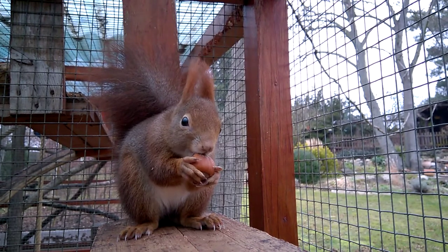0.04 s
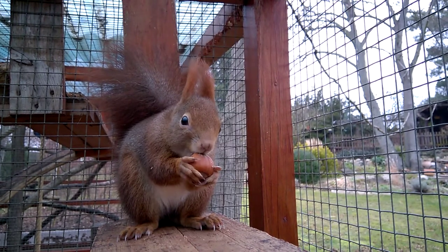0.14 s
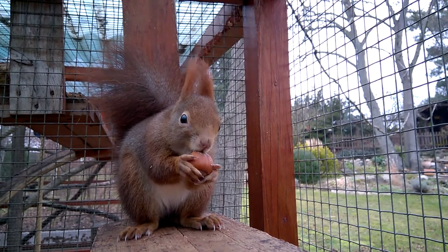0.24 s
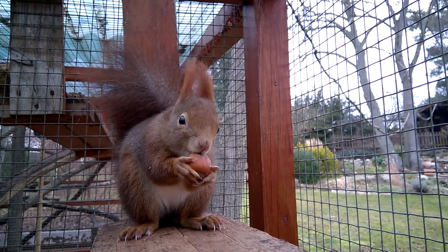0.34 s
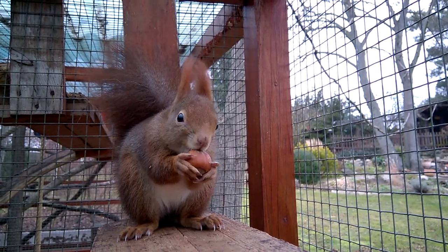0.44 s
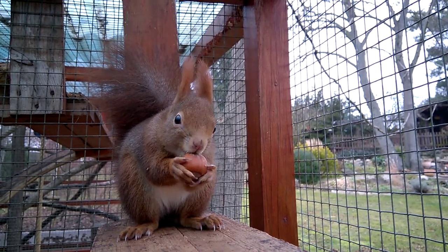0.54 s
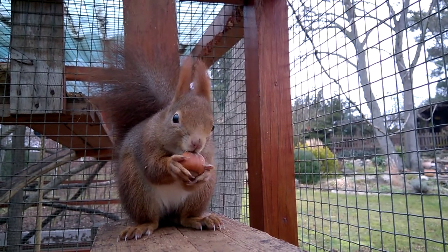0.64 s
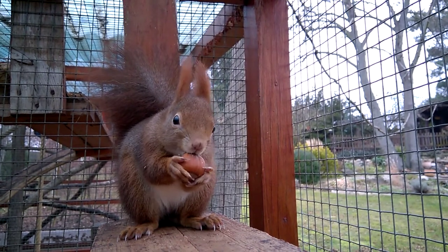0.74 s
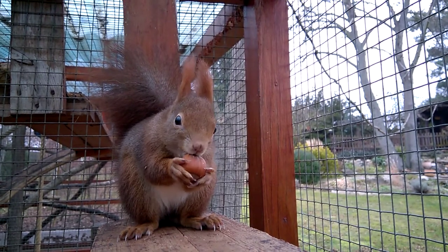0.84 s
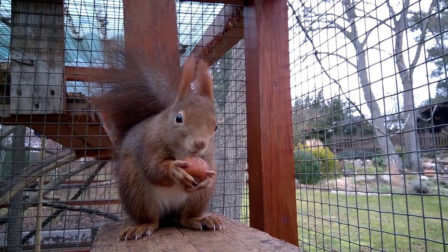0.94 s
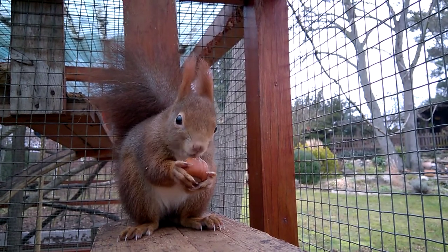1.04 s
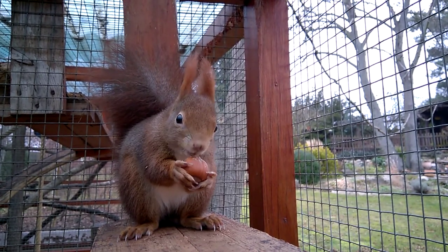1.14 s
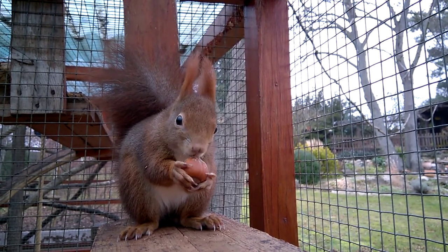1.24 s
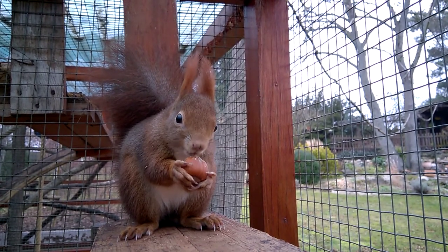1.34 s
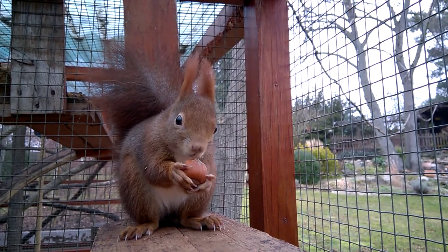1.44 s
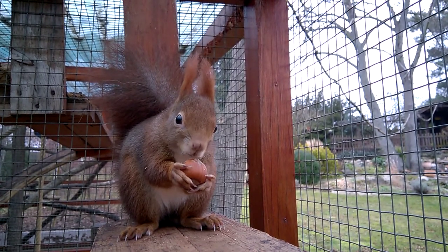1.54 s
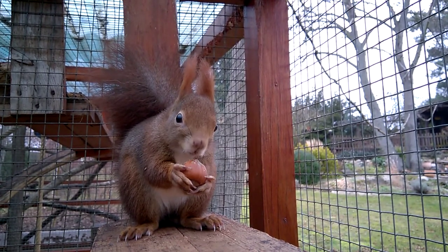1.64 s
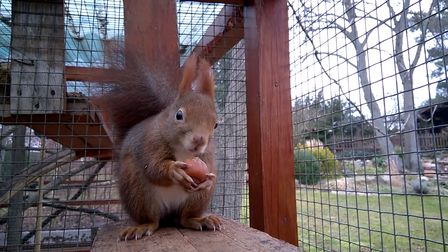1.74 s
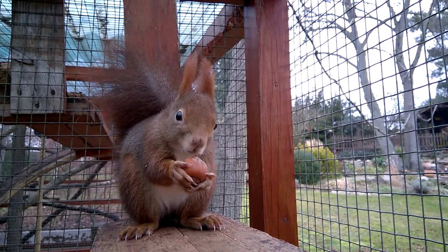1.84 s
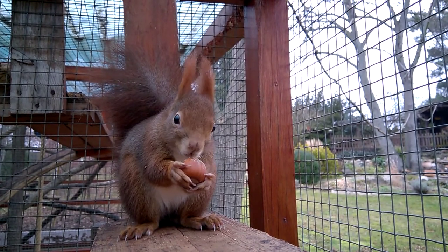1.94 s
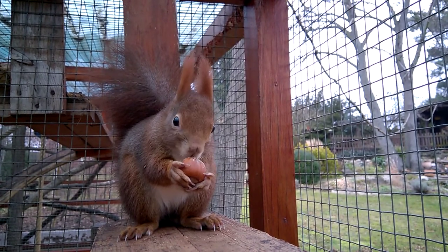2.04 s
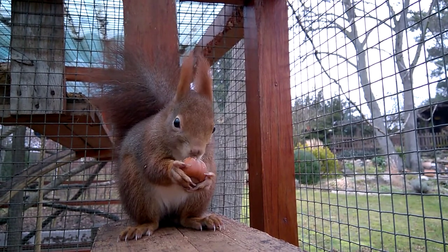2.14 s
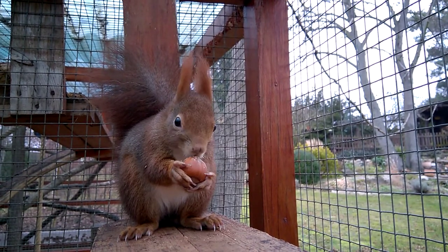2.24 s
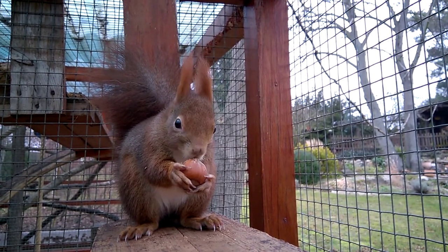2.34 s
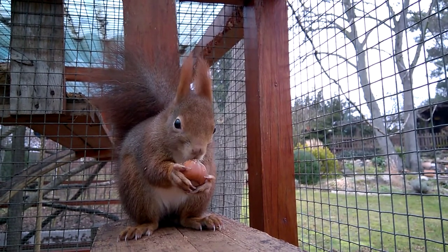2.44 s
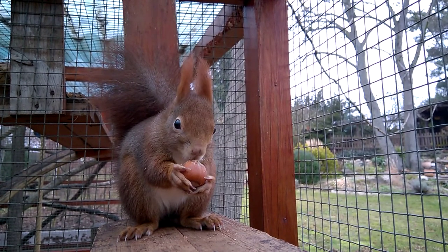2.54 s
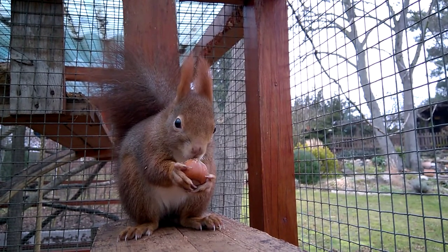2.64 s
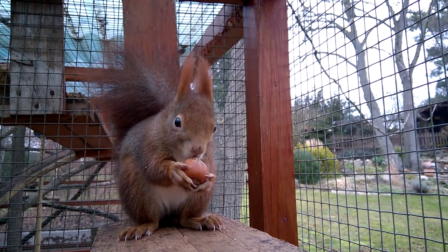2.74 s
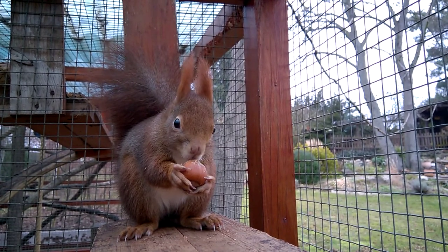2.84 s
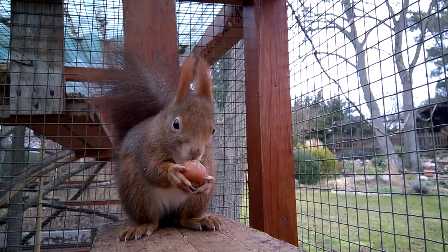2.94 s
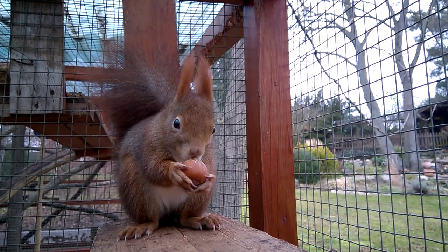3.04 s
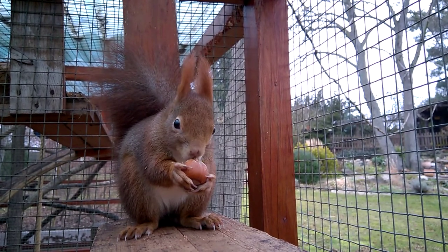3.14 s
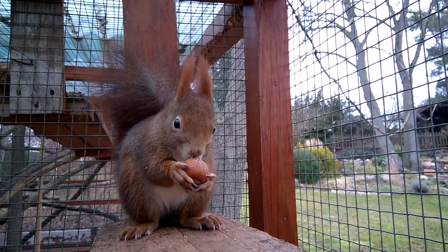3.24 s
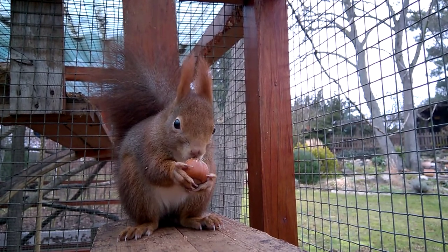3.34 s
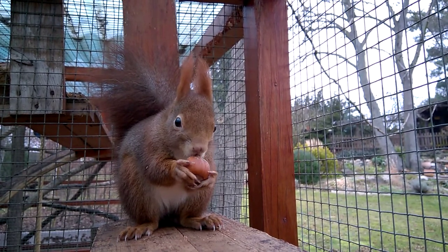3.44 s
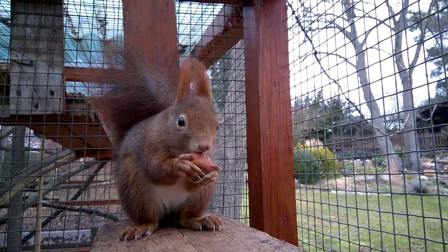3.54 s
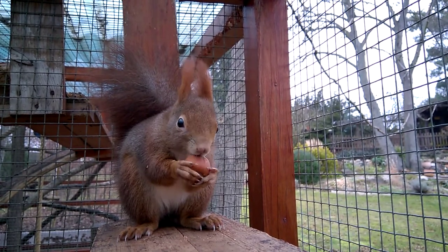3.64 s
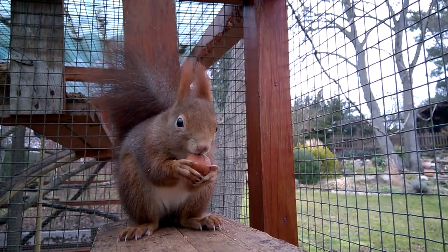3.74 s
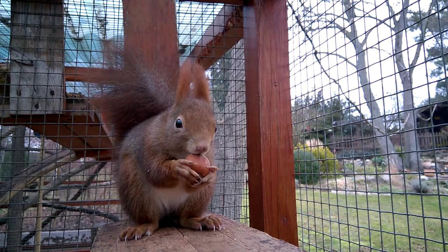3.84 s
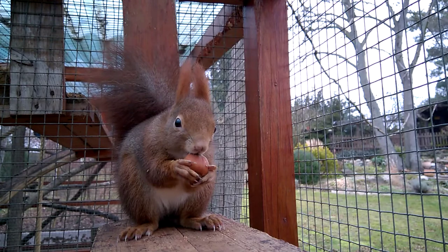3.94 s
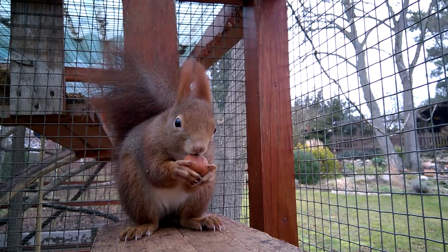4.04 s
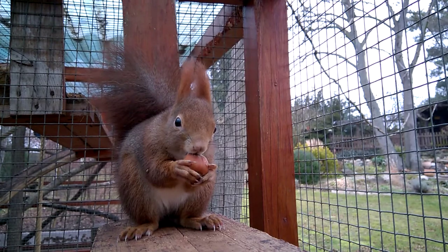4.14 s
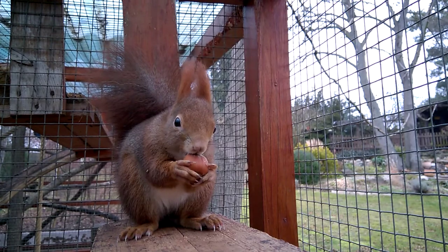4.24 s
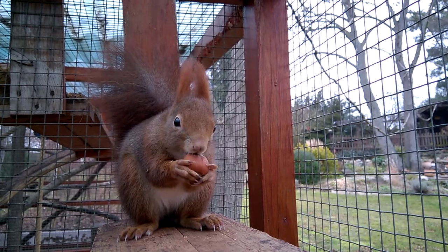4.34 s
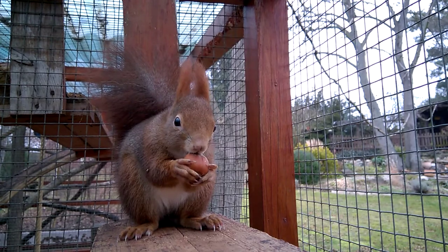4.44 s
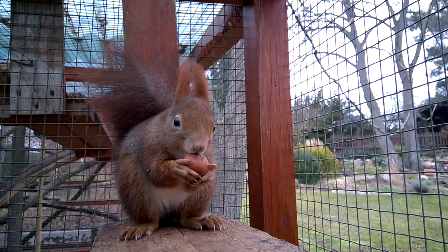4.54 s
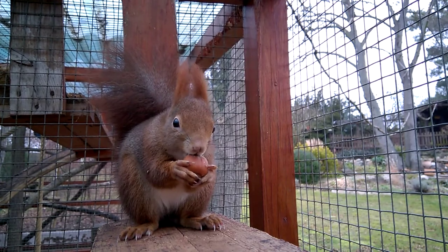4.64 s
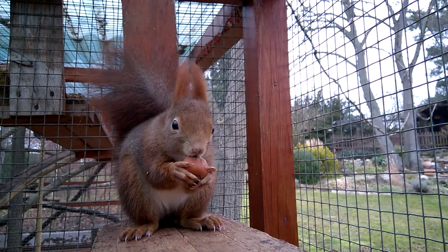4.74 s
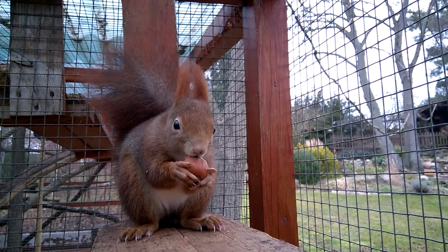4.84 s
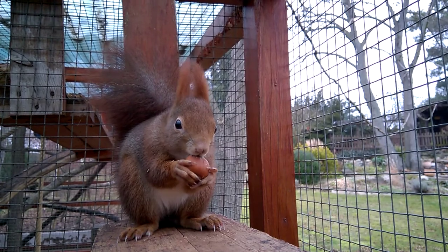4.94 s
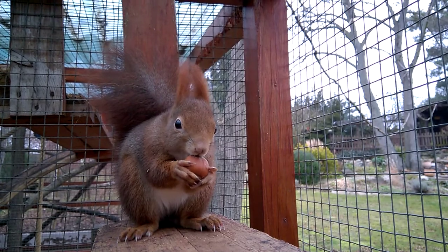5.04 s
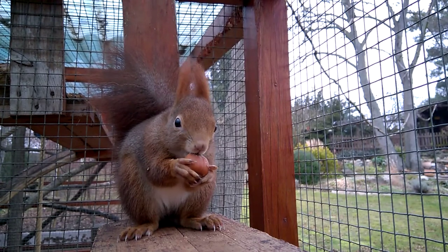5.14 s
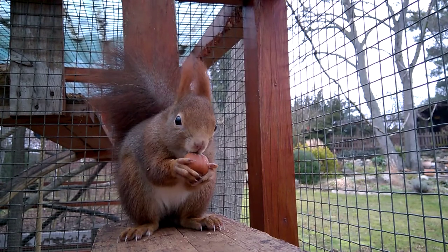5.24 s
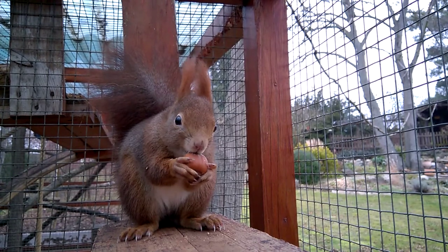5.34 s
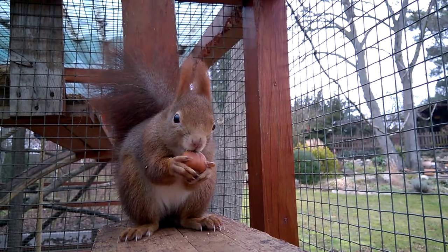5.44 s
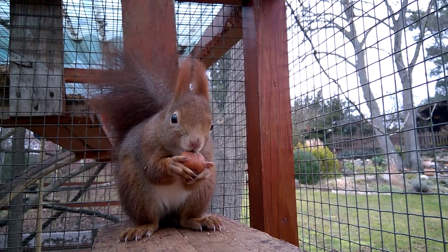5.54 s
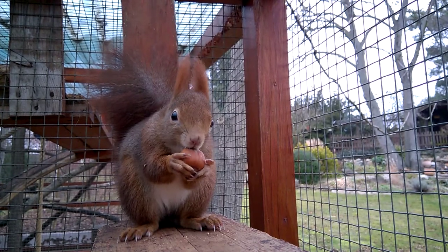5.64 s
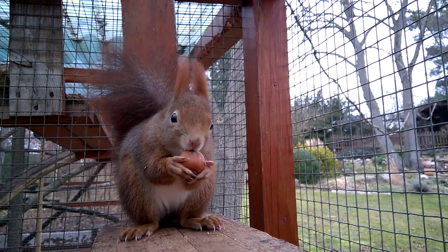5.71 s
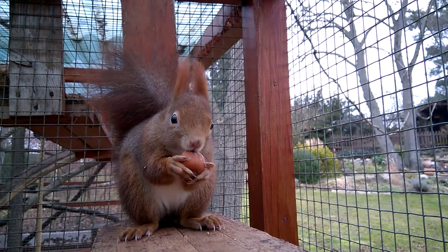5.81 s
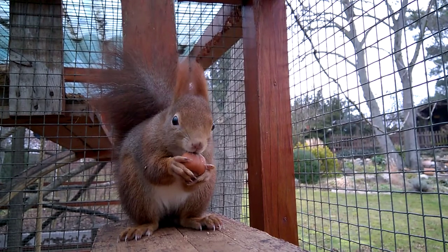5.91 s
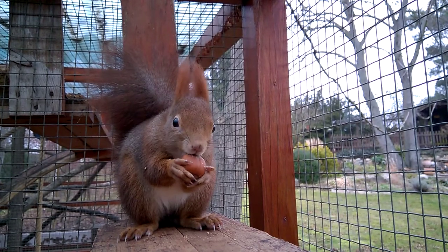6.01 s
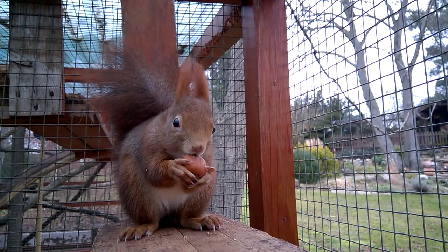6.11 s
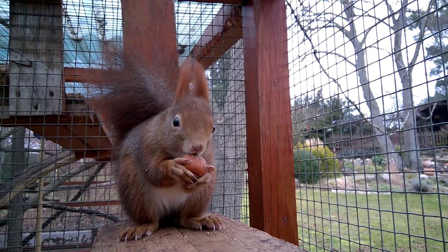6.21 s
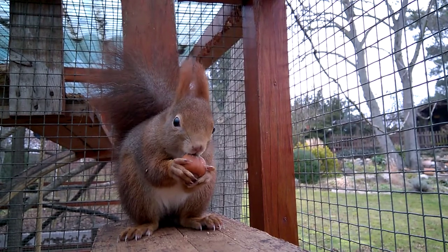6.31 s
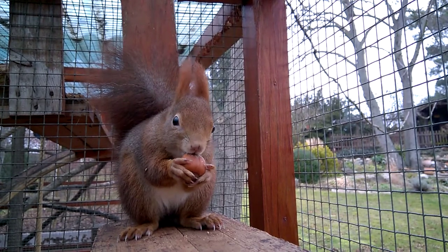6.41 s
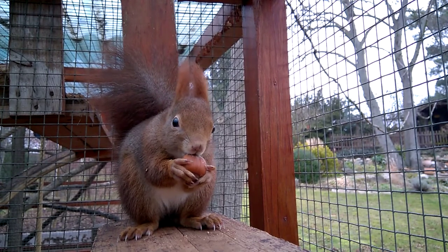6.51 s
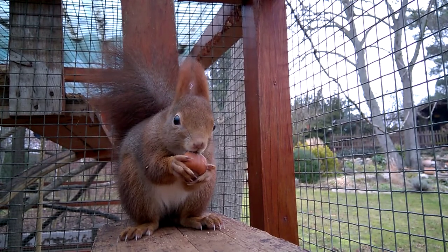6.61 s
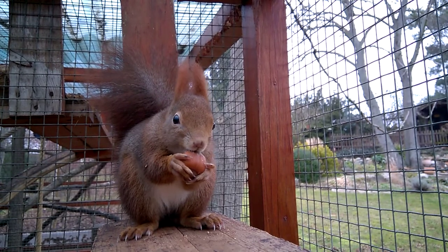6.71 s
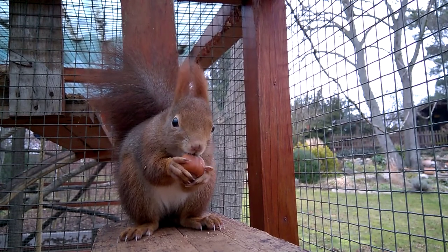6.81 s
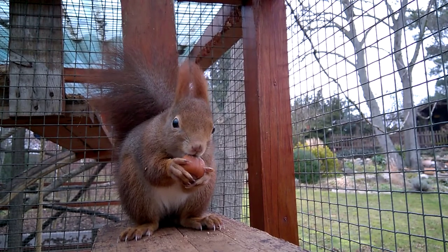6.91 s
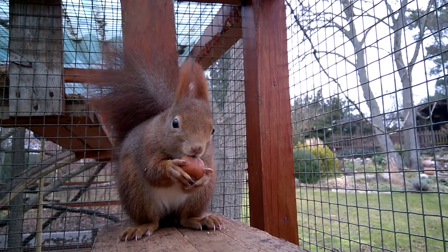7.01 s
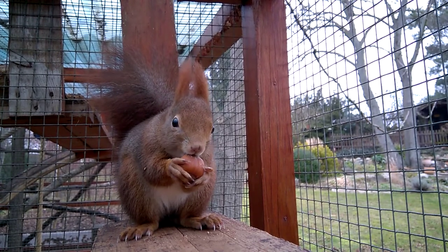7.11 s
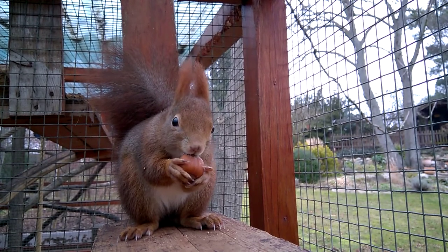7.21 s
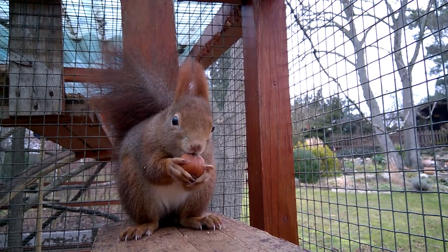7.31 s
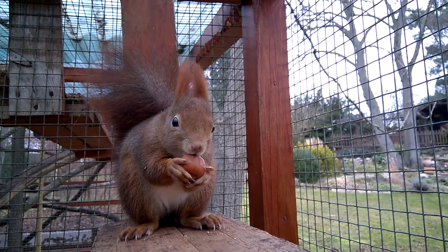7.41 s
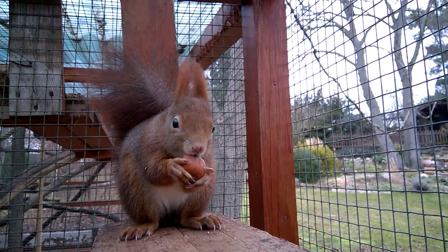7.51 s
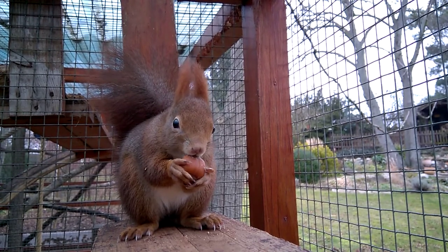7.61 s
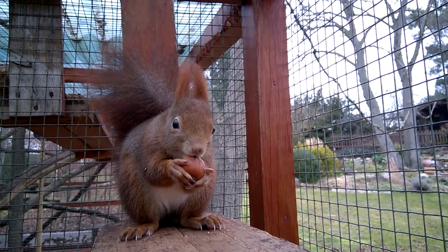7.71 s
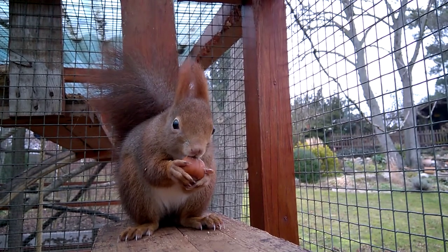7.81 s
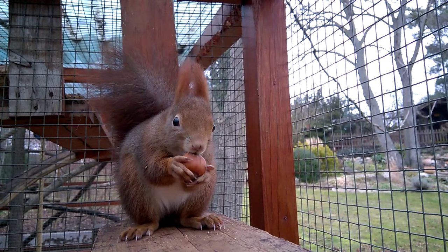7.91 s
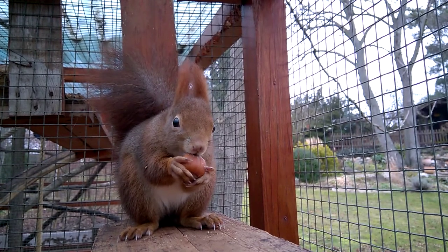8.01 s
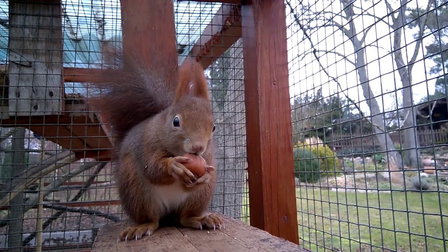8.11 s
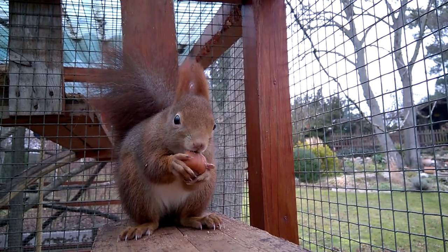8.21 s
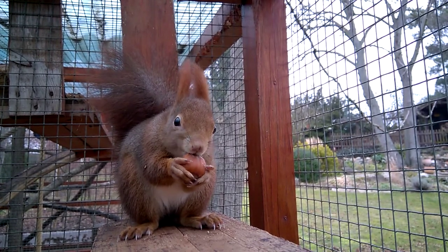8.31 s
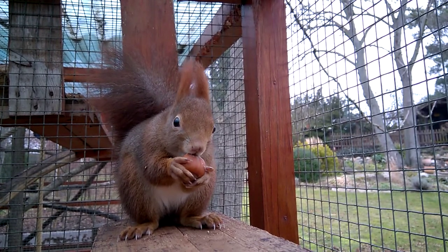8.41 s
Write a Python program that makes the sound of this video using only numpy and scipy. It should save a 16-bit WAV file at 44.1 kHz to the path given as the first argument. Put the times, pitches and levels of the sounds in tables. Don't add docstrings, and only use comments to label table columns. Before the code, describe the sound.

Very close, a squirrel scrapes its teeth on a thick nutshell about eight times a second, with crisp cracks and tiny hollow ticks. After less than a second it stops for about three seconds, leaving thin bird whistles, leaves and far traffic. Gnawing then returns and continues to the end, snappier later. Outdoor wooden cage, close microphone, short dry reflections.

```python
import sys
import numpy as np
from scipy import signal
from scipy.fft import rfft, irfft, next_fast_len
from scipy.io import wavfile
from scipy.ndimage import uniform_filter1d, map_coordinates

SR = 44100
rng = np.random.default_rng(int(sys.argv[2]) if len(sys.argv) > 2 else 0)


def inscribe(sig):
    pcm = np.round(np.clip(np.atleast_2d(sig).T, -1, 1) * 32767)
    wavfile.write(sys.argv[1], SR, pcm.astype(np.int16))


def natural_amplitude(level_db):
    exponent = np.asarray(level_db, float) / 20
    return 10 ** exponent


N = 373082

# (time [s], road level [dB], breeze level [dB])
GARDEN_SWELL = [
    (0, -65, -67.5),
    (1.5, -64, -71.5),
    (3, -61, -71.5),
    (5.2, -60, -67),
    (6.5, -57, -68.5),
    (8.46, -57, -65),
]
# (frequency [Hz], level [dB per Hz])
RUMBLE_COLOUR = [(8.8, -63), (15, 4), (52, -0.5), (98, -6.5), (117, -16.5), (145, -14), (300, -28),
                 (660, -120)]
TRAFFIC_COLOUR = [(120, -52), (200, -6), (264, -13), (357, -4), (498, -5), (670, -6), (900, -13.5),
                  (1400, -90)]
TYRE_COLOUR = [(600, -18.5), (800, -17), (980, 4.5), (1120, -5), (1350, -2), (1700, -14.5), (2600, -29),
               (3500, -38.5)]
LEAF_COLOUR = [(1290, -6.5), (2200, -8.5), (3480, -6.5), (5200, -8), (7540, -19.5), (9000, -55),
               (11700, -41), (19800, -120)]
DUST_COLOUR = [(7500, -20), (8000, -12.5), (8700, 6.5), (10200, 5), (11500, -6), (14000, -10.5),
               (16000, -7.5)]
MIC_HISS_COLOUR = [(300, 4), (8000, -5.5), (10000, -5.5), (12500, -2), (15500, -4.5)]
# (time [s], length [s], start pitch [Hz], end pitch [Hz], level [dB])
NEAR_WHISTLES = [(.37, .057, 6730, 6400, -73), (0.47, 0.075, 6750, 5650, -75),
                 (0.59, 0.068, 6970, 6100, -86), (.62, .02, 5570, 5350, -79), (0.964, .03, 3760, 3670, -88),
                 (1.1, 0.033, 3830, 3920, -86), (1.857, .029, 6100, 5900, -88),
                 (2.157, 0.056, 6190, 5370, -84), (4.855, 0.12, 7340, 6030, -78),
                 (5.07, 0.055, 7100, 6300, -73), (5.63, .04, 3550, 3450, -75),
                 (6.415, .02, 5000, 4950, -76), (6.046, 0.03, 6800, 5700, -83),
                 (7.859, 0.05, 7190, 6500, -68), (8.053, 0.098, 7430, 6540, -76)]
# (time [s], length [s], start pitch [Hz], end pitch [Hz], level [dB])
FAR_CHIRPS = [(1.202, 0.042, 3750, 2520, -81), (1.26, .052, 5700, 5240, -84.5),
              (1.364, 0.027, 6800, 5730, -81.5), (1.413, 0.061, 6000, 3120, -80),
              (1.605, 0.063, 5960, 3800, -80.5), (2.243, 0.068, 8100, 6900, -89),
              (2.297, 0.069, 5050, 3480, -76.5), (2.306, 0.055, 5350, 6700, -78.5),
              (2.455, 0.027, 4700, 6300, -81.5), (3.117, 0.04, 3900, 3040, -77),
              (4.023, 0.045, 5250, 5700, -73), (4.086, 0.029, 4730, 3940, -67.5)]
# (time [s], length [ms], rasp level [dB])
TOOTH_STROKES = [(0.02, 70, -36.5), (0.148, 59, -42), (0.275, 70, -41.5), (0.406, 49.3, -35),
                 (0.52, 74.5, -36.5), (0.652, 56, -45.5), (3.706, 49, -46), (3.821, 44, -43.5),
                 (3.919, 67, -46), (4.05, 52, -42), (4.154, 48, -39), (4.256, 47, -35.5),
                 (4.351, 65, -44.5), (4.472, 57, -39.5), (4.588, 55, -33.5), (4.715, 63, -38),
                 (4.867, 54, -45.5), (4.99, 64.5, -41.5), (5.123, 67, -42), (5.251, 48.6, -44.5),
                 (5.397, 35, -47.5), (5.512, 37.5, -41.5),
                 (5.676, 71, -50.5), (5.834, 67, -53), (5.951, 73, -44.5), (6.091, 51, -42),
                     (6.211, 49, -37.5), (6.314, 85, -37.5), (6.455, 62, -39), (6.607, 50, -52.5),
                     (6.759, 24, -40), (6.863, 50, -45), (7.013, 15.7, -37.5), (7.129, 36, -45),
                     (7.259, 15, -49.5), (7.506, 23, -46.5), (7.633, 83, -43), (7.816, 77, -42.5),
                     (7.944, 55, -39.5), (8.113, 20.8, -45.5), (8.264, 54, -38), (8.396, 76, -44)]
# (time [s], length [ms], rasp level [dB])
TURNING_TOUCHES = [
    (2.585, 90, -73.5),
    (3.11, 79, -74.5),
    (3.48, 25, -74.5),
    (3.535, 81, -66),
]
# (time [s], peak level [dB], sharpness [dB])
BIG_CRACKS = [(.6787, -15, -17.5), (.7014, -20, -2), (.7209, -15, -5), (.7563, -21.5, -0.5),
              (4.272, -17.5, -6), (4.6464, -18, -7.5), (4.744, -23, -11), (4.7537, -18, -8),
              (4.7584, -20, 0), (5.155, -24, 2), (5.7153, -14, -4), (5.7452, -17, -9.5),
              (5.8594, -19, -9.5), (5.8734, -16.5, 1), (6.3585, -15.5, -7), (6.4855, -18, -13),
              (6.4997, -18, 0.5), (6.6444, -20.5, -2), (6.6569, -12, -3.5), (6.9061, -23, 2),
              (7.0223, -19.5, -2.5), (7.0315, -14.5, -3.5), (7.1393, -16.5, 0.5), (7.1443, -12, -19),
              (7.5331, -17.5, -4), (7.8719, -18.5, -6), (8.1532, -17.5, -3), (8.1729, -14, 1),
              (8.1804, -20, -8), (8.2941, -23.5, 4.5)]
# (time [s], peak level [dB], skips [count], gap [ms])
SKIP_RUNS = [(.0352, -30, 2, 4), (.0654, -26, 2, 6.2), (.1694, -27, 3, 4.1), (.2943, -25, 4, 7.3),
             (.4198, -24, 4, 5.3), (.5328, -31, 2, 3.7), (.5475, -23, 6, 4.2), (.6838, -24, 2, 4.4),
             (3.947, -30, 2, 2.8), (4.1675, -27, 3, 5.6), (4.291, -29, 2, 6.7), (4.3766, -30, 2, 4.4),
             (4.3938, -31, 2, 3.5), (4.4973, -28, 3, 4.6), (4.5165, -27, 2, 5.5), (4.6168, -17, 5, 3.9),
             (5.0031, -33, 3, 10), (5.9757, -29, 3, 8), (6.1124, -29, 2, 5.2), (6.1308, -26, 2, 9.5),
             (6.2281, -25, 4, 4), (6.3438, -23, 3, 4), (6.3783, -24, 2, 6), (6.4893, -22, 2, 6.9),
             (6.8851, -33, 2, 3.5), (7.4027, -20, 3, 2.4), (7.6838, -25, 2, 6.5), (7.8352, -28, 3, 3.4),
             (7.9619, -26, 3, 4.1), (7.9829, -27, 3, 4.6)]
# (time [s], peak level [dB])
SMALL_CHIPS = [(0.0552, -23.5), (0.1895, -27), (.2045, -29), (.446, -26.5), (0.5785, -26.5), (3.716, -49),
               (3.8383, -44), (4.0779, -31), (4.276, -35), (4.3678, -35), (4.6038, -51), (4.7302, -30),
               (4.8851, -22), (4.8923, -36), (5.269, -26), (5.529, -51), (5.5425, -33.5), (5.8545, -19.5),
               (6.398, -25), (6.463, -32), (6.7741, -24), (6.9102, -22.5), (7.2612, -29.5), (7.5196, -32),
               (7.5282, -20), (7.7038, -22), (7.8541, -22.5), (7.8644, -28), (8.142, -21.5),
               (8.4463, -26.5),
               (0.6717, -27), (0.7184, -24), (4.7463, -19), (4.7993, -32), (5.2985, -39), (5.405, -51),
                 (5.6007, -42.5), (5.706, -30), (5.8362, -40.5), (6.5418, -38), (6.7027, -34.5),
                 (6.9295, -29.5), (6.998, -45), (7.011, -35), (7.0568, -33.5), (7.1864, -39.5),
                 (7.2782, -38), (7.3167, -35), (7.355, -64), (7.3935, -38), (7.5359, -19.5),
                 (7.6685, -27.5), (7.7411, -50), (8.036, -23.5), (8.131, -29.5), (8.2763, -32),
                 (8.4401, -28.5)]
# (time [s], looseness [dB])
PAW_GRIP = [(0, -11), (.3, -2), (.55, -4.5), (.72, -4.5), (3.8, -7.5), (4.2, -1.5), (4.6, -9), (5.35, -3.5),
            (5.8, -10.5), (6.2, -7), (6.5, -7), (7, -10.5), (7.9, -7.5), (8.46, -9.5)]
# (frequency [Hz], width [Hz], level [dB])
SHELL_MODES = [(2879, 140, 0), (3303, 210, -3), (3800, 870, -15.5)]
UPPER_MODES = [(4287, 620, 7.5), (4850, 67, -21.5), (5800, 355, -3.5), (6517, 274, 12.5), (7100, 154, 6)]
HOLLOW_MODES = [(958, 145, 13), (1244, 120, 10.5), (1725, 311, 16), (2175, 259, 15), (2410, 80, 13.5)]
# (delay [ms], level [dB])
NEAR_BOUNCE = (1.455, -6)
# (delay [ms], level [dB])
CAGE_WALLS = [
    (3.3, -12),
    (8.8, -19),
    (17, -28),
]


def unit(x):
    return x / np.sqrt(np.mean(x ** 2, axis=-1, keepdims=True) + 1e-20)


def filtered(x, response):
    m = next_fast_len(N + SR // 2)
    return irfft(rfft(x, m) * response(np.fft.rfftfreq(m, 1 / SR)), m)[:N]


def rush(colour, patchy_db):
    z = signal.stft(rng.standard_normal(N), nperseg=512)[2]
    field = uniform_filter1d(rng.standard_normal(z.shape), size=6, axis=0)
    field = uniform_filter1d(field, size=14, axis=1)
    patched = signal.istft(z * natural_amplitude(patchy_db * field / field.std()), nperseg=512)[1][:N]
    f_hz, db = np.transpose(colour)
    return unit(filtered(patched, lambda hz: natural_amplitude(np.interp(np.log(hz + 1), np.log(f_hz + 1), db))))


def garden():
    s, *levels = np.transpose(GARDEN_SWELL)
    road_db, air_db = [np.interp(np.arange(N) / SR, s, level) for level in levels]
    busy_db = road_db - road_db.mean()
    rumble = natural_amplitude(-46.5 + 0.23 * busy_db) * rush(RUMBLE_COLOUR, patchy_db=0.8)
    tyres = natural_amplitude(-67 + 1.73 * busy_db) * rush(TYRE_COLOUR, patchy_db=0.2)
    traffic = natural_amplitude(road_db) * rush(TRAFFIC_COLOUR, patchy_db=1.54)
    leaves = natural_amplitude(air_db) * rush(LEAF_COLOUR, patchy_db=1.5)
    return rumble + traffic + tyres + leaves


def birds():
    near_blur_hz, far_blur_hz, trees_t60_s = 39.2, 220, 0.92
    out = np.zeros(N + SR)
    notes = [(*n, near_blur_hz) for n in NEAR_WHISTLES] + [(*n, far_blur_hz) for n in FAR_CHIRPS]
    for s, length_s, from_hz, to_hz, db, blur_hz in notes:
        u = np.linspace(0, 1, round(length_s * SR))
        wander = unit(uniform_filter1d(rng.standard_normal(SR // 5), size=60))[:len(u)]
        pitch_hz = from_hz * (to_hz / from_hz) ** u + blur_hz * wander
        tone = np.sin(2 * np.pi * np.cumsum(pitch_hz) / SR)
        swell = np.sin(np.pi * u) ** 0.5 * natural_amplitude(blur_hz / 80 * wander[::-1])
        out[round(s * SR):][:len(u)] += natural_amplitude(db + 14) * swell * tone
    t = np.arange(SR // 3) / SR
    trees = rng.standard_normal(len(t)) * natural_amplitude(-60 * t / trees_t60_s)
    return out[:N] + natural_amplitude(-1.5) * signal.fftconvolve(out, trees / np.linalg.norm(trees))[:N]


def looseness(s):
    return np.interp(s, *np.transpose(PAW_GRIP))


def rasp(slips_hz, scatter_db, smooth_share):
    rise_share, usual_db, damping_db_per_db = 0.45, -41, 0.14
    t, hard, hollow = np.arange(N) / SR, np.zeros(N), np.zeros(N)
    for s, length_ms, db in TOOTH_STROKES + TURNING_TOUCHES:
        length_s = length_ms / 1000
        bite = np.interp(t, [s - 0.008, s + rise_share * length_s, s + length_s], [0, 1, 0])
        hollow_db = looseness(s) - damping_db_per_db * (db - usual_db)
        hard += natural_amplitude(db) * bite ** 1.38
        hollow += natural_amplitude(db + hollow_db) * bite ** 1.3
    slips = (rng.random(N) < slips_hz / SR) * natural_amplitude(scatter_db * rng.standard_normal(N))
    slips = slips * rng.choice([-1, 1], N)
    drag = unit(slips) + smooth_share * rng.standard_normal(N)
    return natural_amplitude(-11.5) * hard * drag, natural_amplitude(-6.5) * hollow * drag


def all_breaks():
    skip_loss_db, skip_scatter_db = 1.63, 0.36
    small_sharp_db, sharp_scatter_db = -9, 6.5
    usual_db, damping_db_per_db, hollow_scatter_db = -27, 0.38, 4.5
    skips = [(s + k * gap_ms / 1000, db - skip_loss_db * k)
             for s, db, count, gap_ms in SKIP_RUNS for k in range(count)]
    small_s, small_db = np.array(skips + SMALL_CHIPS).T
    luck = rng.standard_normal((len(small_s), 2))
    small_db = small_db + skip_scatter_db * luck[:, 0]
    small = np.c_[small_s, small_db, small_sharp_db + sharp_scatter_db * luck[:, 1]]
    s, db, sharp_db = np.r_[BIG_CRACKS, small].T
    hollow_db = looseness(s) - damping_db_per_db * (db - usual_db)
    hollow_db = hollow_db + hollow_scatter_db * rng.standard_normal(len(s))
    return np.c_[s, db, hollow_db, sharp_db]


def chips(crack_ms, splinter_ms):
    t = np.arange(SR // 200) / SR
    breaks = all_breaks()
    lives_ms = np.array([[crack_ms], [splinter_ms], [crack_ms]])
    cracks = 0.2 * rng.standard_normal((len(breaks), 1, len(t))) * np.exp(-t * 1000 / lives_ms)
    cracks[..., 0] = 1
    force = np.zeros((3, N + SR))
    for (s, db, hollow_db, sharp_db), crack in zip(breaks, cracks):
        share_db = np.array([[1.5], [sharp_db - 0.95], [hollow_db - 3.0]])
        force[:, round(s * SR):][:, :len(t)] += natural_amplitude(db + share_db) * crack
    return force[:, :N]


def ringing(x, modes):
    def body(f):
        total = 0
        for k, (centre_hz, width_hz, db) in enumerate(modes):
            damping = 1j * f * width_hz
            total = total + (-1) ** k * natural_amplitude(db) * damping / (centre_hz ** 2 - f * f + damping)
        return total
    return filtered(x, body) / np.abs(filtered(np.arange(2) == 0, body)).max()


def near_bounce(x):
    waver_share, waver_hz = 0.012, 6
    ms, db = NEAR_BOUNCE
    n = np.arange(N)
    waver = map_coordinates(rng.standard_normal(N * waver_hz // SR + 4), [n * waver_hz / SR])
    return x - natural_amplitude(db) * np.interp(n - ms * SR / 1000 * (1 + waver_share * waver), n, x)


def dust(sharp):
    decay = natural_amplitude(-120 * np.arange(SR // 30) / SR / 0.034)
    cloud = np.sqrt(np.abs(signal.fftconvolve(sharp ** 2, decay)[:N]))
    density = cloud.max() * (cloud / cloud.max()) ** 0.95
    return natural_amplitude(-33) * density * rush(DUST_COLOUR, patchy_db=1.5)


def nut():
    drag, loose = rasp(slips_hz=800, scatter_db=3.3, smooth_share=0.45)
    blows = chips(crack_ms=0.12, splinter_ms=1.3)
    hard, sharp, hollow = blows + [drag, natural_amplitude(-4.0) * drag, loose]
    above_hollow = signal.butter(3, 2600.0, "high", fs=SR, output="sos")
    above_rumble = signal.butter(3, 800.0, "high", fs=SR, output="sos")
    below_dust = signal.butter(6, 7150.0, "low", fs=SR, output="sos")
    shell = ringing(hard, SHELL_MODES) + ringing(sharp, UPPER_MODES)
    bright = near_bounce(signal.sosfilt(above_hollow, shell))
    body = signal.sosfilt(above_rumble, ringing(hollow, HOLLOW_MODES))
    return signal.sosfilt(below_dust, bright + body) + dust(sharp)


def cage(x, tail_db, t60_s, versions):
    t, out = np.arange(SR // 5) / SR, np.zeros(N)
    version = (np.arange(N) // (SR // 30)) % versions
    for k in range(versions):
        answer = rng.standard_normal(len(t)) * natural_amplitude(-60 * t / t60_s) * (t > 0.004)
        answer *= natural_amplitude(tail_db) / np.linalg.norm(answer)
        for ms, db in CAGE_WALLS:
            answer[round(ms * rng.uniform(0.93, 1.07) * SR / 1000)] += natural_amplitude(db)
        held = uniform_filter1d(1.0 * (version == k), size=400)
        out += signal.fftconvolve(x * held, answer)[:N]
    return x + out


def scene():
    gnawing = cage(nut(), tail_db=-15.5, t60_s=0.064, versions=7)
    return (garden() + birds() + gnawing)[None]


def low_pass(x):
    return signal.sosfilt(signal.butter(12, 16400, fs=SR, output="sos"), x)


def record(dry):
    top_hz = 15760
    hiss = natural_amplitude(-78) * rush(MIC_HISS_COLOUR, patchy_db=0.5)
    heard = filtered(dry[0] + hiss, lambda hz: hz < top_hz)
    return low_pass(heard[None])


dry = scene()
out = record(dry)
inscribe(out)
```